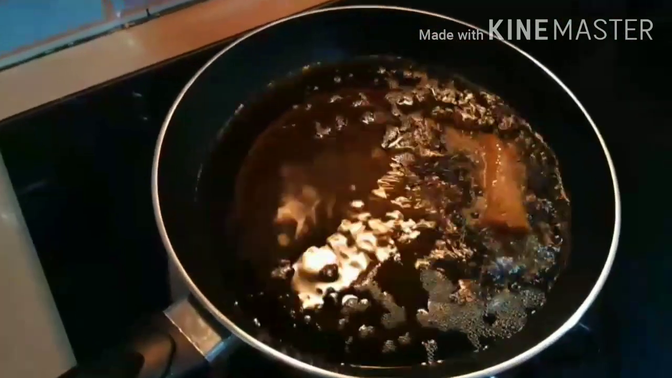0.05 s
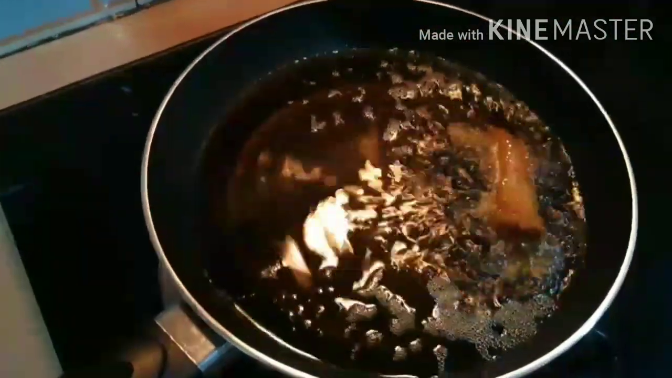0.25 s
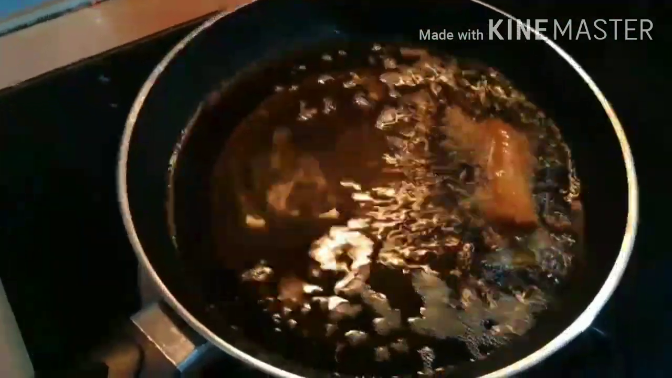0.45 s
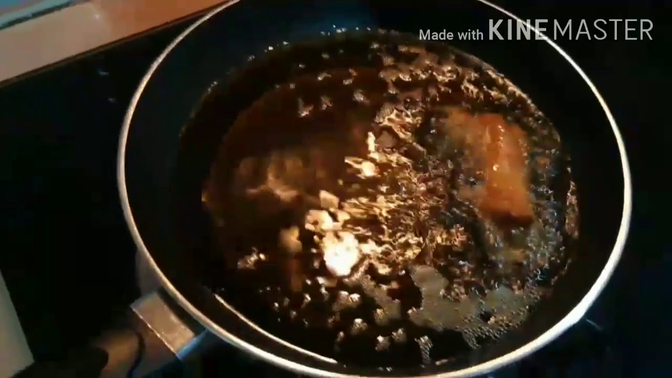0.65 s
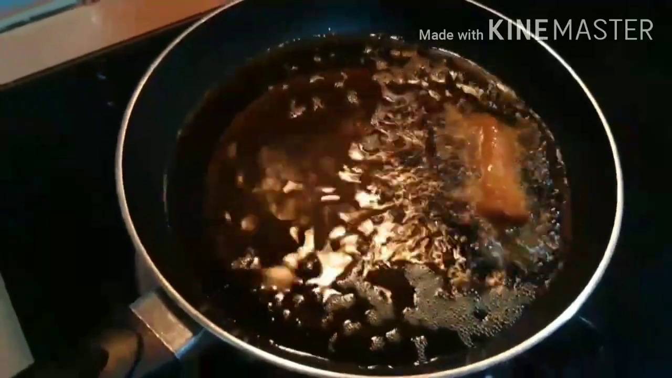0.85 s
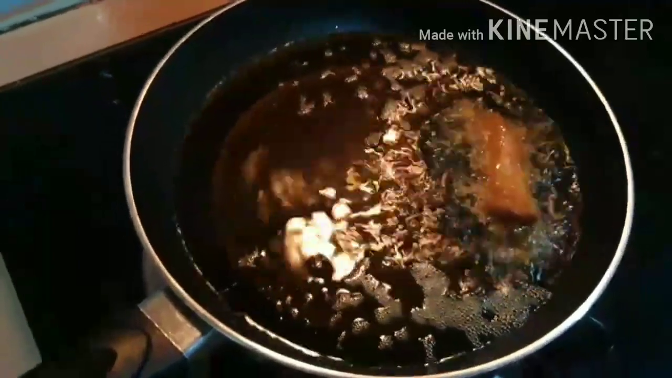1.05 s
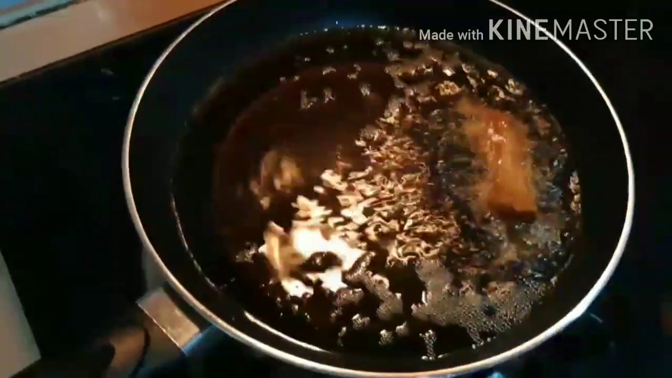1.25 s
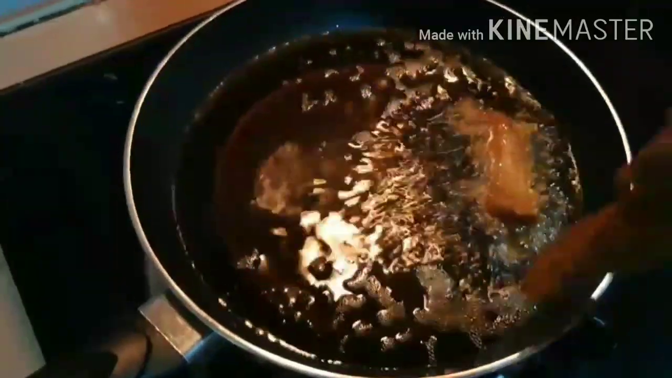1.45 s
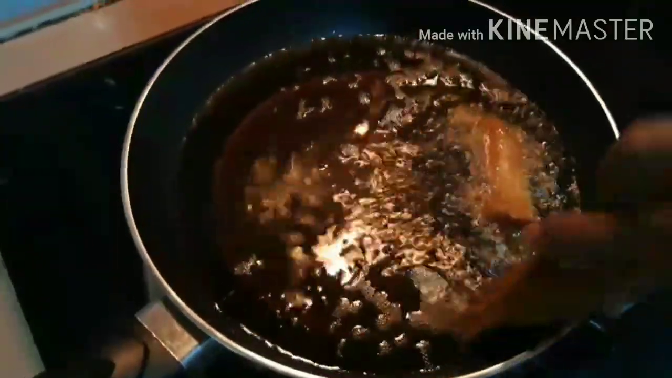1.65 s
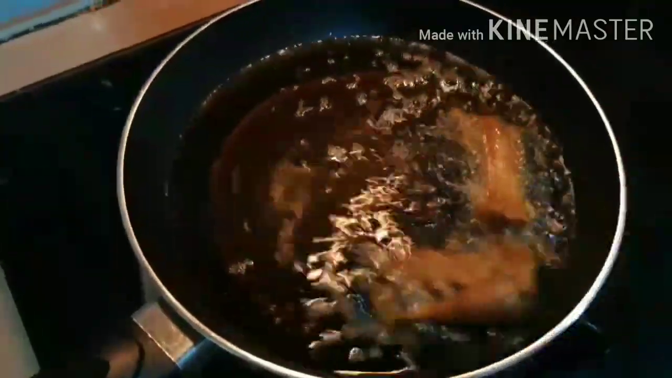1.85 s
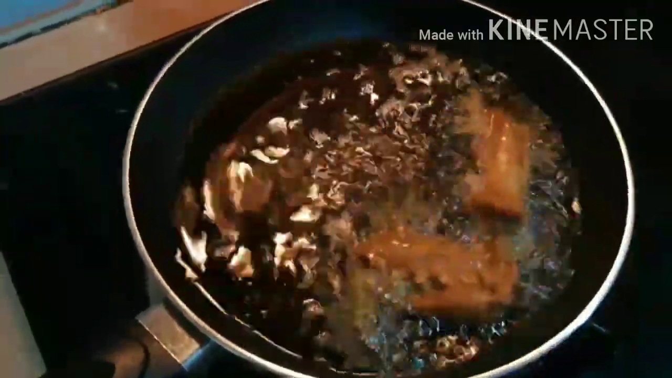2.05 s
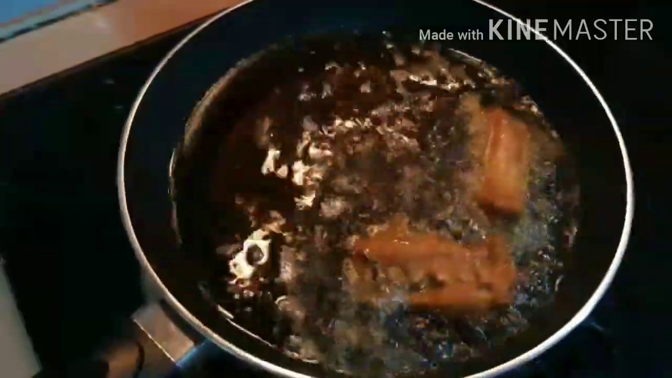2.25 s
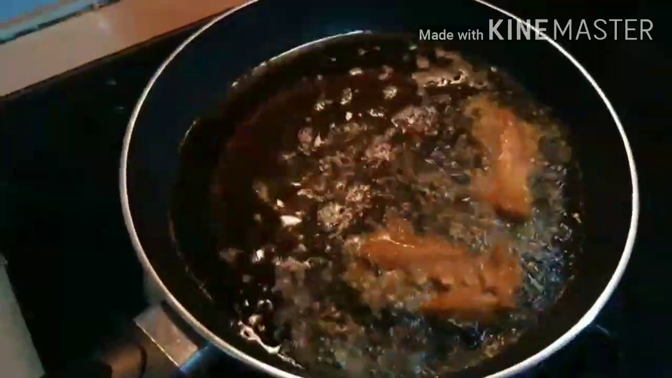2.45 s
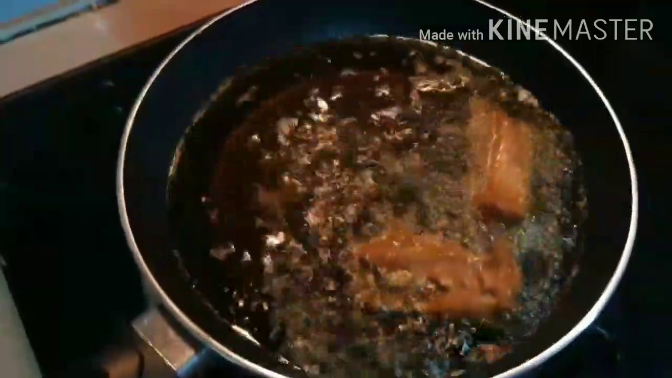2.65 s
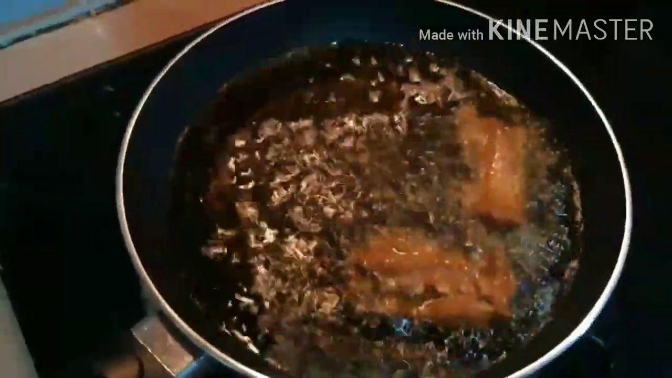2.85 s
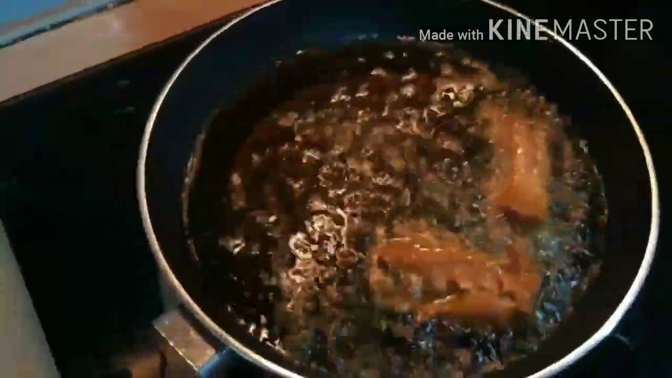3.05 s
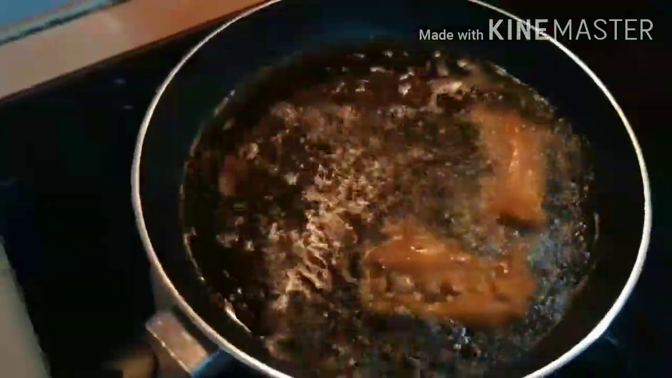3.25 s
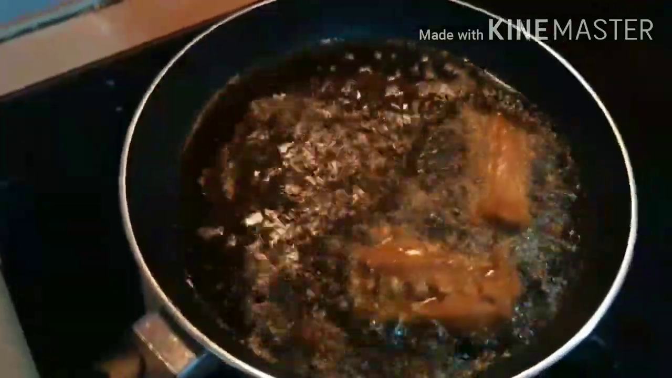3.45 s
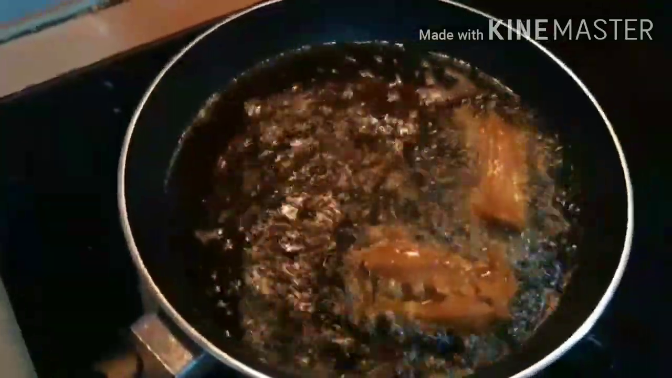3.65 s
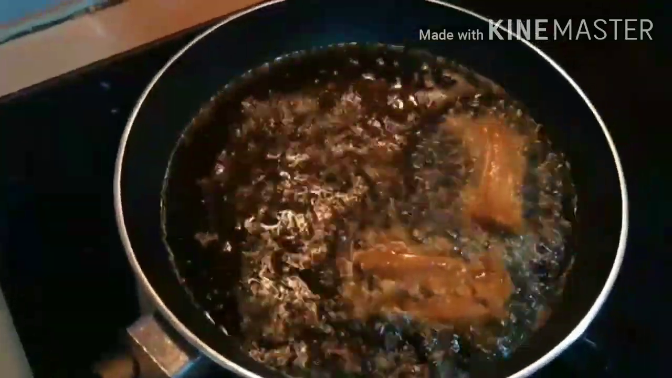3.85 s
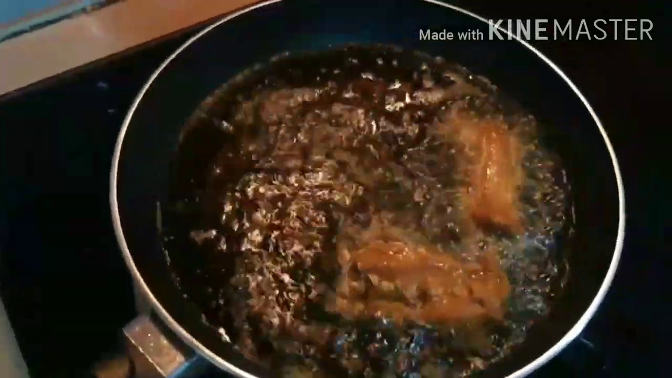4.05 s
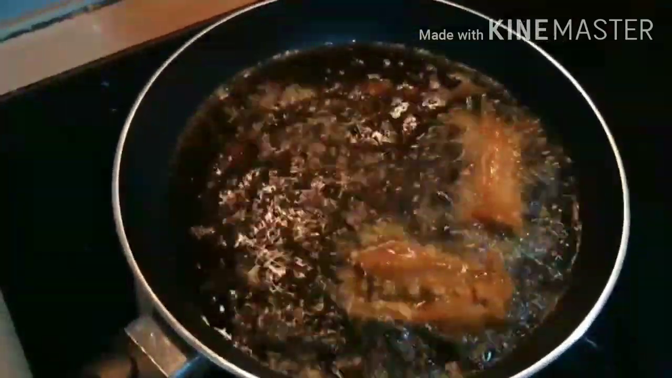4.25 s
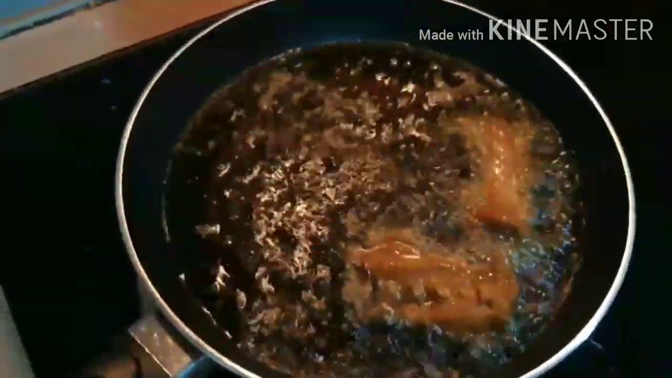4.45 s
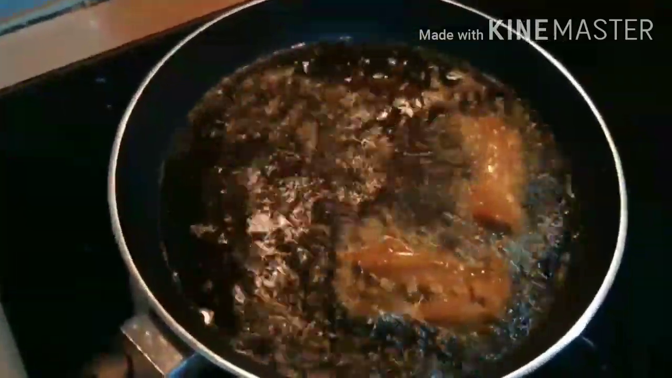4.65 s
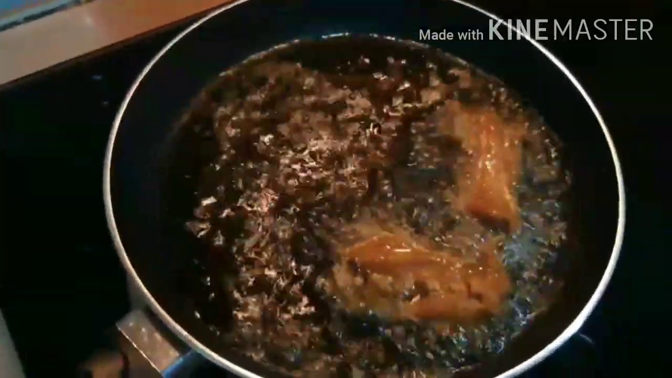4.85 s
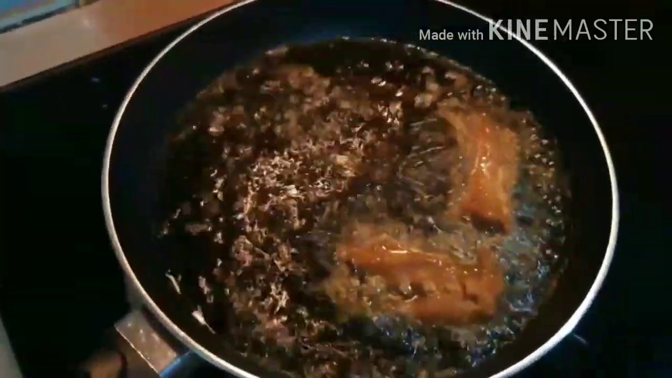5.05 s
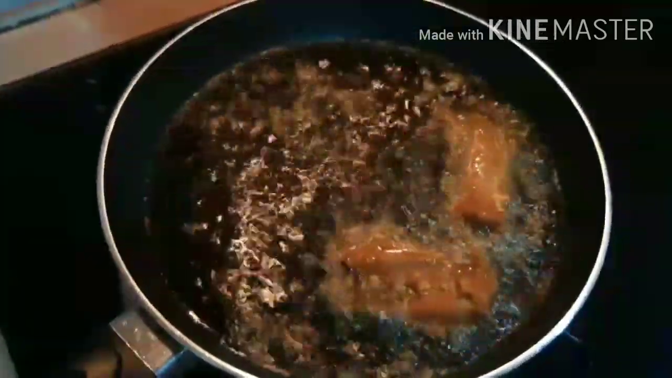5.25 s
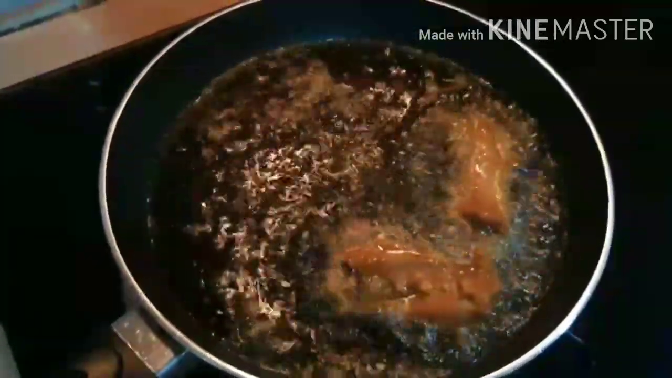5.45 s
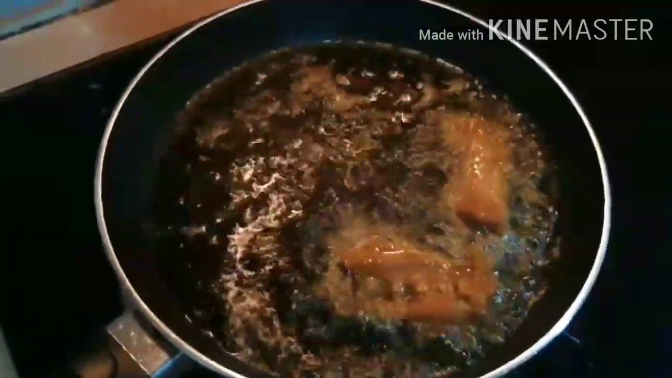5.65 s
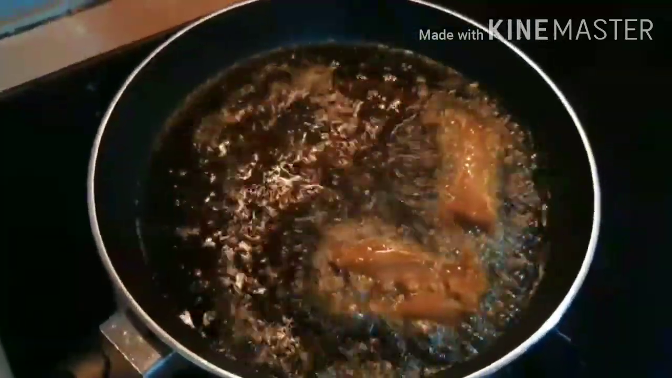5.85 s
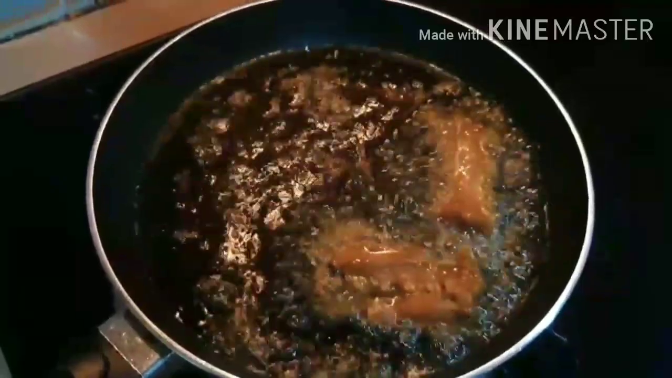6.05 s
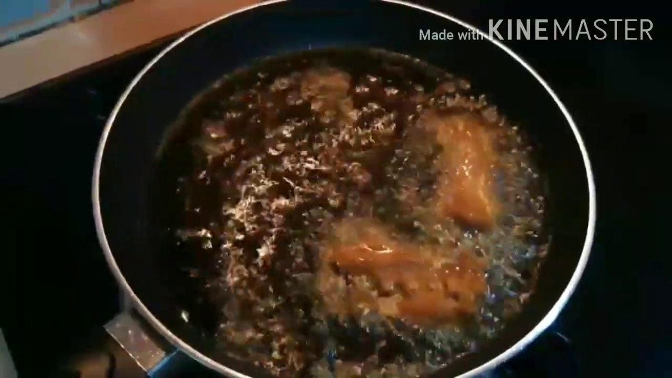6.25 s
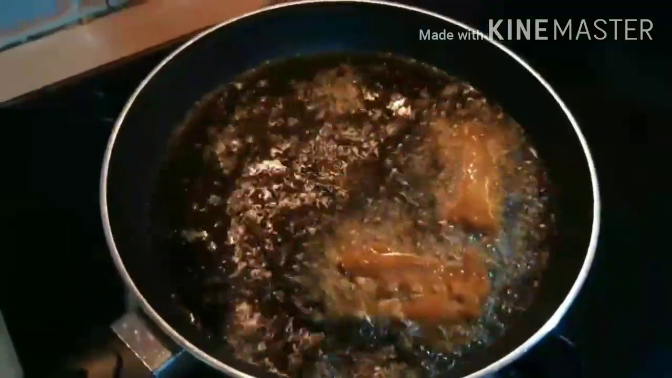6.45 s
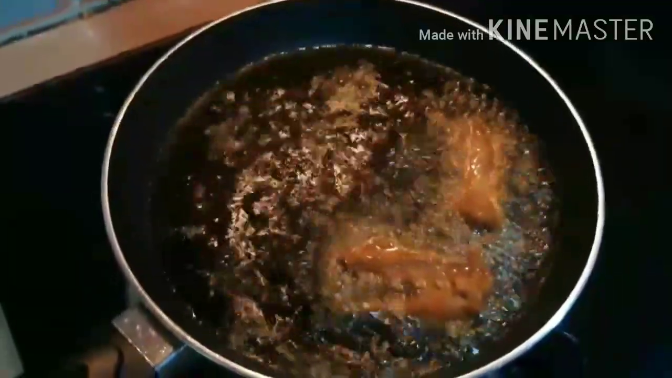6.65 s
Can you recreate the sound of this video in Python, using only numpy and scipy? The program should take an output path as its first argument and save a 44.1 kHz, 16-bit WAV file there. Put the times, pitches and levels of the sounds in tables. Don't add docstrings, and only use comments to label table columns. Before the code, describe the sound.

Close to a steel pan in a small home kitchen, one piece of chicken crackles in hot oil with sharp pops and fine droplet ticks. The sizzle thins briefly, then near two seconds a second piece slips in and the boil jumps louder and denser, with hollow bubbling blips. Faint quick footfalls thud underneath until about four seconds.

```python
import sys
import numpy as np
from scipy import signal
from scipy.fft import rfft, irfft, next_fast_len
from scipy.io import wavfile
from scipy.ndimage import uniform_filter1d, map_coordinates

SR = 44100
rng = np.random.default_rng(int(sys.argv[2]) if len(sys.argv) > 2 else 0)


def output_pcm(signal):
    pcm = np.clip(np.atleast_2d(signal).T, -1, 1) * 32767
    wavfile.write(sys.argv[1], SR, np.round(pcm).astype(np.int16))


def voltage_ratio(decibels):
    exponent = np.asarray(decibels, float) / 20
    return 10 ** exponent


N = 295911

BUBBLE_PITCHES = [1000, 2900, 7000, 13000]
BUBBLE_SWING = [0.46, 0.67, 0.88, 0.61]
BUBBLE_DRIFT = [1, 1, .7, 1]
BUBBLE_SURGE = [6.5, 2.5, -0.5, 1]


def bubble_levels(hz, t):
    lands_s, rise_s, settle_s = 1.99, 0.093, 0.46
    since = t - lands_s
    surge = np.exp(-np.maximum(-since / rise_s, since / settle_s))
    frame_at = np.minimum(t * SR, N - 1).astype(int)
    levels = []
    for swing, surge_db, drift_db in zip(BUBBLE_SWING, BUBBLE_SURGE, BUBBLE_DRIFT):
        drift = drift_db * wobble(4.986)[frame_at]
        levels.append(swing * strength(t) + surge_db * surge + drift)
    blend = np.array([along(list(zip(BUBBLE_PITCHES, row)), hz) for row in np.eye(4)]).T
    return blend @ levels


# from_s, to_s, pitch_hz, width_hz, level_db
PAN_ECHOES = [
    (-.1, 0.85, 2160, 410, -9),
    (-.1, 0.79, 4960, 330, -7),
    (0.87, 1.9, 4900, 680, -10),
    (0.78, 2.1, 8430, 1550, -5),
    (-.1, 2.66, 2800, 390, -5),
    (0.87, 2., 12100, 2000, -5),
    (-.1, 2.4, 15000, 1500, 0.5),
    (0.88, 0.97, 13000, 7500, 6),
]


def pan_echoes(hz, t):
    total = 0
    for from_s, to_s, pitch_hz, width_hz, level_db in PAN_ECHOES:
        notch = np.exp(-(2 * (hz[:, None] - pitch_hz) / width_hz) ** 2)
        fade = np.clip(np.minimum(t - from_s, to_s - t) / .1 + .5, 0, 1)
        total = total + level_db * notch * fade
    return total


def boil():
    hiss = voltage_ratio(0.21 * wobble(14) + 0.64 * wobble(70)) * rng.standard_normal(N)
    hiss_db = np.interp(np.arange(N) / SR, [1.8, 2.3], [-4.5, -.2])
    sizzle = unit(froth(count=17000, spread_db=4.4, size=260) + voltage_ratio(hiss_db) * unit(hiss))
    sizzle = unit(filtered(sizzle, pan_colour))
    hz, t, z = signal.stft(sizzle, SR, nperseg=512)
    gain_db = bubble_levels(hz, t) + STRONG_DB + 0.97 + pan_echoes(hz, t)
    patches = uniform_filter1d(rng.standard_normal(z.shape), size=4, axis=0)
    patches = uniform_filter1d(patches, size=4, axis=1)
    return signal.istft(z * voltage_ratio(gain_db + 0.57 * unit(patches)), SR, nperseg=512)[1][:N]


def froth(count, spread_db, size):
    busy = np.cumsum(voltage_ratio(3 * wobble(110) + 1.7 * wobble(40) + .5 * wobble(14)))
    draw = rng.random((count, 4))
    start_s = np.interp(draw[:, 0], busy / busy[-1], np.arange(N) / SR)
    pitch_hz = 500 * 30 ** draw[:, 1] ** 0.855
    excess = np.minimum(-np.log(1 - draw[:, 2]), 3)
    excess *= np.clip(np.minimum(pitch_hz / 2500, 8000 / pitch_hz), .35, 1)
    cycles = .6 + 3.5 * draw[:, 3] ** 3
    bubbles = clatter(bursts(start_s, spread_db * excess, pitch_hz, cycles, size), wet_db=-2.5, t60=.022)
    z = rfft(bubbles)
    envelope = np.sqrt(abs(uniform_filter1d(abs(z) ** 2, size=4001)) + 1e-12)
    return unit(irfft(z / envelope, N))


STRONG_DB = -21
# time_s, level_db
BOIL_STRENGTH = [(0, -25.5), (.3, -25.5), (.7, -26), (1, -26), (1.4, -30), (1.75, -25.5), (2.05, -21),
                 (2.11, -19.5), (2.35, -20), (2.7, -20.5), (3.1, -20), (3.66, -20), (4.35, -23.5),
                 (5.05, -22), (5.45, -24), (6.2, -24), (6.5, -21), (6.71, -21)]


def strength(t):
    return np.interp(t, *np.transpose(BOIL_STRENGTH)) - STRONG_DB


# pitch_hz, level_db (per Hz)
OIL_COLOUR = [(230, -39), (400, -24.5), (510, -27.5), (590, -14), (1300, -14.5), (1900, -7), (3000, -4),
              (5000, -0.5), (8300, -1.5), (10500, -7), (11500, -7), (13000, -16), (14000, -18),
              (15400, -16.5)]
# pitch_hz, width_hz, level_db
BOWL_MODES = [(625, 38, 7.5), (694, 93, -3), (907, 133, 4), (1136, 43, 5), (1190, 68, -4), (1436, 154, 3),
              (1685, 26, -9.5), (2240, 35, 4), (2334, 166, -7.5), (3020, 57, -2.5), (3100, 110, 4),
              (3550, 130, 0), (6200, 330, -1), (7000, 330, 2), (9300, 1330, 7)]


def pan_colour(f):
    bowl_db = sum(db / (1 + (2 * (f - hz) / width) ** 2) for hz, width, db in BOWL_MODES)
    return voltage_ratio(along(OIL_COLOUR, f) + bowl_db)


# start_s, level_db (peak), pitch_hz
LOUD_POPS = [(.0936, -11.5, 7300), (.1621, -4, 9400), (.299, -11, 8040), (.4708, -8, 5560), (.57, -8, 5700),
             (.7648, -4.5, 8200), (.7738, 0, 11300), (.7976, -3, 8200), (.8157, -5, 8200),
             (.9074, -10, 6680), (.941, -8, 5670), (1.1182, -9.5, 9300), (1.5519, -11, 6930),
             (1.7823, -4.5, 6800), (1.832, -3.5, 9150), (1.9651, -2.5, 6070), (2.0953, -1, 8800),
             (2.263, -1, 7000), (2.3937, -5, 7300), (2.9144, -9, 8300), (3.1426, 1, 6640),
             (3.2522, -2, 9650), (3.5459, -8, 9400), (4.1117, -6, 9910), (4.5601, -6.5, 7020),
             (4.945, -6, 6420), (4.9677, -7, 6930), (6.4795, -5, 9600), (6.517, -4, 7400),
             (6.6898, 1.5, 8200)]


def pops():
    start_s, level_db, pitch_hz = np.vstack([LOUD_POPS, lesser_pops(count=110)]).T
    draw = rng.random((len(start_s), 3))
    ring = bursts(start_s, level_db + 1.1, pitch_hz, 2.4 + 3 * draw[:, 0], size=500)
    snap_hz = 8000 * (.6 + .6 * draw[:, 1])
    snap = bursts(start_s, level_db - 3, snap_hz, 1 + draw[:, 2], size=100)
    kicks = np.bincount(np.round(start_s * SR).astype(int), voltage_ratio(level_db - 9.0), N)[:N]
    spray_fade = voltage_ratio(-60 * np.arange(900) / SR / 0.0087)
    spray = np.convolve(kicks, spray_fade)[:N] * rng.standard_normal(N)
    return ring + voltage_ratio(5.0) * filtered(snap + spray, pan_colour)


def lesser_pops(count):
    low_hz, high_hz = 5270, 9850
    draw = rng.random((count, 3))
    start_s = (np.arange(count) + draw[:, 0]) / count * (N - 1) / SR
    level_db = -11.5 + 0.52 * strength(start_s) + 5 * 2 * (draw[:, 1] - .5)
    return np.transpose([start_s, level_db, low_hz + (high_hz - low_hz) * np.sqrt(draw[:, 2])])


# start_s, level_db, pitch_hz, length_cycles
STEAM_POCKETS = [
    (1.961, -21, 320, .5),
    (2.085, -29, 633, 5.6),
    (3.222, -33, 500, 2),
    (3.234, -29.5, 405, 5),
]
# start_s, level_db (peak), pitch_hz
RINGING_BUBBLES = [(.2324, -13, 3570), (.3227, -12, 3300), (.5613, -9, 2940), (1.259, -16, 3860),
                   (1.8796, -6.5, 3680), (2.0348, -6, 3850), (2.0505, -7, 3720), (2.0947, -4, 3570),
                   (2.163, -6, 2970), (2.177, -2, 3550), (2.2523, -4, 3250), (2.3682, -14, 2900),
                   (2.469, -10, 3080), (2.4987, -3, 3100), (2.536, -5, 3180), (2.6289, -6, 4070),
                   (2.811, -9.5, 3060), (2.9387, -6.5, 3290), (3.3463, -5.5, 3200), (3.3997, -12.5, 2030),
                   (3.4461, -7, 3100), (3.6706, -8, 2670), (4.6543, -11, 3550), (4.9528, -5, 3200),
                   (5.13, -11.5, 2120), (5.6685, -10, 3560), (6.572, -7, 2780)]


def blops():
    pockets = bursts(*np.transpose(STEAM_POCKETS), size=4000)
    start_s, level_db, pitch_hz = np.transpose(RINGING_BUBBLES)
    return pockets + bursts(start_s, level_db - 3.5, pitch_hz, 5.5 + 0 * start_s, size=1200)


# pitch_hz, level_db
JET_COLOUR = [(6200, -30), (7500, 3), (9500, 1), (10500, -15), (12000, -4), (13500, -30)]


def spit():
    start_s, length_s, level_db = .765, .055, -25
    since = np.arange(N) / SR - start_s
    gate = np.clip(np.minimum(since / .004, (length_s - since) / .015 + 1), 0, 1)
    jet = unit(filtered(rng.standard_normal(N), lambda f: voltage_ratio(along(JET_COLOUR, f))))
    return voltage_ratio(level_db + 3.9 * wobble(121)) * gate * jet


def ticks(count):
    bright_hz = 9000
    draw = rng.random((count, 3))
    start_s = draw[:, 0] * (N - 1) / SR
    level_db = -14 + .5 * strength(start_s) + 4 * 2 * (draw[:, 1] - .5)
    size = voltage_ratio(level_db) * np.sign(draw[:, 2] - .5)
    clicks = np.bincount(np.round(start_s * SR).astype(int), size, N)[:N]
    clicks = filtered(clicks, lambda f: pan_colour(f) * (1 + (f / bright_hz) ** 2))
    return clatter(clicks, wet_db=-5, t60=.012)


# start_s, level_db (peak), upper_db (upper board modes)
FOOTFALLS = [(0.045, -33, -8.5), (.094, -31, -18), (.121, -29.5, -15), (.243, -31.5, -16), (.332, -36, -9),
             (0.379, -38, -15), (.557, -35, -11), (.611, -37, -6), (.78, -40, -7), (.804, -41, -10),
             (.93, -38, -8), (1.082, -41, -13), (1.218, -40, -9), (1.291, -34, -13), (1.478, -40, -9),
             (1.556, -42, -9), (1.753, -44, -7), (1.809, -36, -18), (2.004, -36, -10), (2.336, -39, -6),
             (2.485, -39.5, -9), (2.625, -37.5, -10), (2.703, -36, -16), (2.89, -35, -6.5),
             (3.115, -39, -7), (3.181, -38, -7), (3.478, -39.5, -6), (3.741, -36.5, -6),
             (3.908, -38, -14.5), (4.009, -33.5, -12)]
# start_s, level_db (peak)
LIGHT_TOUCHES = [(.265, -40), (.698, -45), (.962, -44), (1.69, -49), (2.044, -41), (2.144, -48),
                 (2.252, -42), (3.254, -37), (3.346, -42), (3.589, -42), (4.18, -47)]
# pitch_hz, level_db, t60_s
FLOOR_MODES = [(85, -11, .08), (127, -1, .09), (205, 6, .055), (240, 8, .07), (300, 0, .055),
               (402, -4, .055)]


def steps():
    out, t = np.zeros(N + SR), np.arange(SR // 4) / SR
    falls = list(FOOTFALLS) + [(start_s, level_db, -9.5) for start_s, level_db in LIGHT_TOUCHES]
    draws = rng.standard_normal((len(falls), len(FLOOR_MODES)))
    for (start_s, level_db, upper_db), draw in zip(falls, draws):
        ring = 0
        for k, ((hz, mode_db, t60), d) in enumerate(zip(FLOOR_MODES, draw)):
            fade = voltage_ratio(mode_db + 1.3 * d + (hz > 180) * upper_db - 60 * t / t60)
            ring = ring + (-1) ** k * fade * np.sin(2 * np.pi * hz * (1 + 0.035 * d) * t)
        soft_onset = 1 - np.exp(-t / 0.0044)
        out[round(start_s * SR):][:len(t)] += voltage_ratio(level_db + 4.0) * ring * soft_onset
    return out[:N]


# pitch_hz, t60_s
ROOM_DECAY = [(300, 0.24), (3000, 0.12), (12000, 0.039)]


def walls(x):
    hz, t, z = signal.stft(rng.standard_normal(SR // 2), SR, nperseg=256)
    tail = signal.istft(z * voltage_ratio(-60 * t / along(ROOM_DECAY, hz)[:, None]), SR, nperseg=256)[1]
    delayed = np.pad(x, (130, 0))
    return signal.fftconvolve(delayed, tail / np.linalg.norm(tail))[:N]


# pitch_hz, level_db (per Hz)
MURMUR_COLOUR = [(15, -63), (25, -14), (108, 0), (172, -8.5), (225, -0.5), (305, -8.5), (388, -4),
                 (482, -29), (520, 2), (680, -50), (1140, -120)]


def kitchen():
    murmur = unit(filtered(rng.standard_normal(N), lambda f: voltage_ratio(along(MURMUR_COLOUR, f))))
    upper = filtered(murmur, lambda f: f > 300)
    rise = voltage_ratio(1.2 * (strength(np.arange(N) / SR) + 0.8))
    return voltage_ratio(-59 + 1.5 * wobble(5)) * (murmur - upper + upper * rise)


def bursts(start_s, level_db, pitch_hz, cycles, size):
    t = np.arange(size) / SR
    age = pitch_hz[:, None] * t / cycles[:, None]
    envelope = voltage_ratio(level_db)[:, None] * np.exp(-age) * (1 - np.exp(-6 * age))
    ring = envelope * np.sin(2 * np.pi * pitch_hz[:, None] * t * (1 + 0.017 * age))
    at = np.round(start_s * SR).astype(int)[:, None] + np.arange(size)
    return np.bincount(at.ravel(), ring.ravel(), N + size + SR)[:N]


def clatter(x, wet_db, t60):
    tail = voltage_ratio(-60 * np.arange(1200) / SR / t60) * rng.standard_normal(1200)
    return x + voltage_ratio(wet_db) * signal.fftconvolve(x, tail / np.linalg.norm(tail))[:N]


def unit(x):
    return x / np.sqrt(np.mean(x ** 2) + 1e-20)


def along(points, hz):
    f, v = np.transpose(points)
    return np.interp(np.log(hz + 1), np.log(f + 1), v)


def wobble(rate):
    knots = rng.standard_normal(int(N * rate / SR) + 4)
    return map_coordinates(knots, [np.arange(N) * rate / SR])


def filtered(x, response):
    m = next_fast_len(N + SR // 2)
    return irfft(rfft(x, m) * response(np.fft.rfftfreq(m, 1 / SR)), m)[:N]


def scene():
    near = pops() + blops() + spit()
    feet = steps()
    room = walls(voltage_ratio(-7) * near + voltage_ratio(-12.5) * feet)
    return (boil() + near + feet + room + kitchen() + ticks(count=260))[None]


def band_limit(x):
    return signal.sosfilt(signal.butter(12, 15690, fs=SR, output="sos"), x)


def record(dry):
    limited = dry[0] / (1 + abs(dry[0] / .9) ** 5) ** (1 / 5)
    mix = filtered(limited, lambda f: np.clip((15600 - f) / 150 + .5, 0, 1) * f ** 2 / (f ** 2 + 45 ** 2))
    return band_limit(mix[None])


dry = scene()
out = record(dry)
output_pcm(out)
```